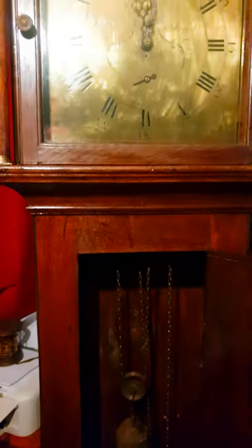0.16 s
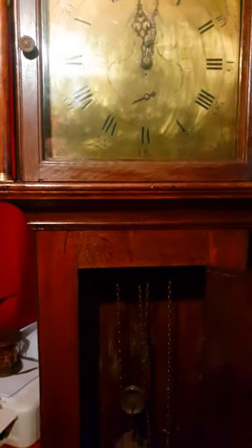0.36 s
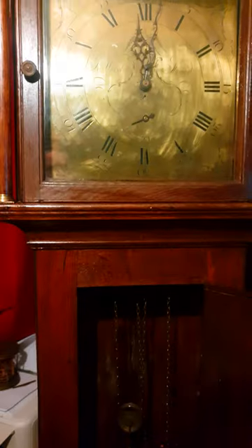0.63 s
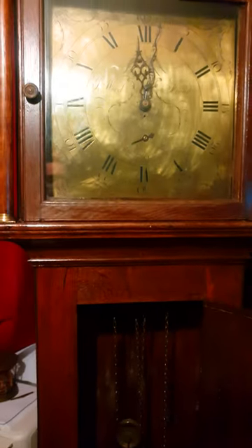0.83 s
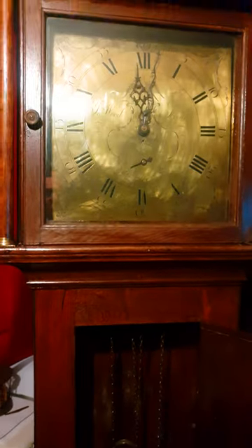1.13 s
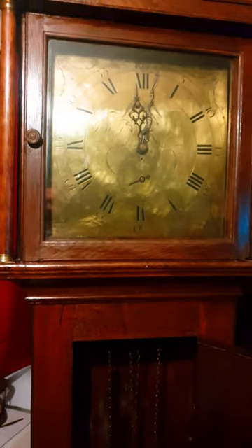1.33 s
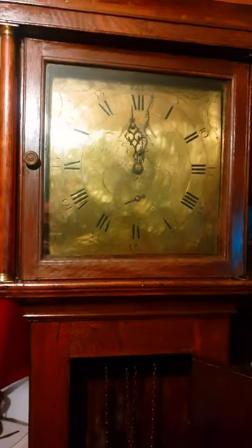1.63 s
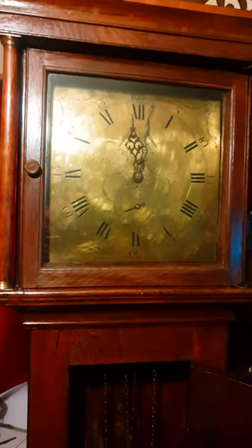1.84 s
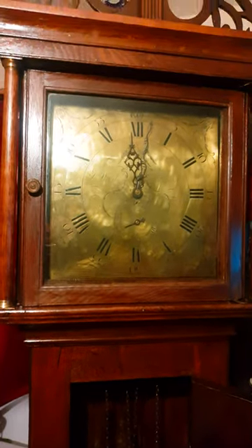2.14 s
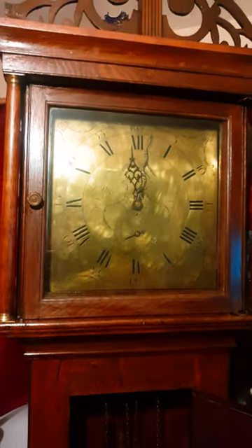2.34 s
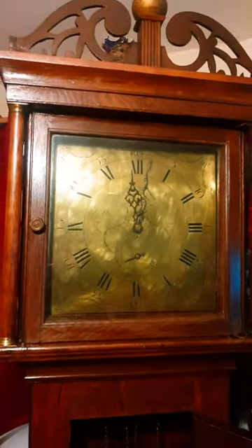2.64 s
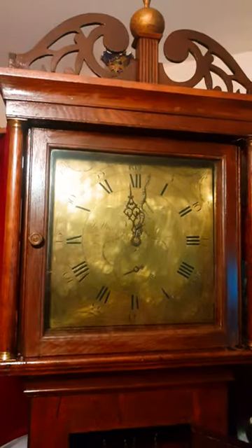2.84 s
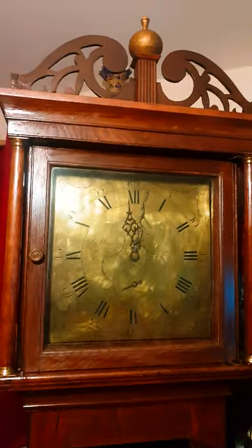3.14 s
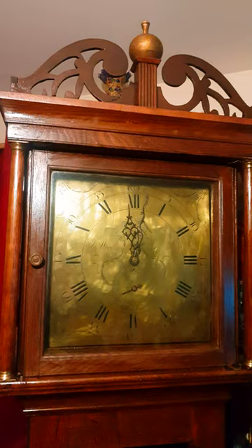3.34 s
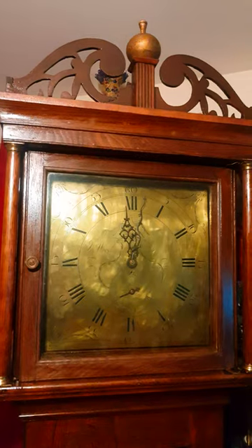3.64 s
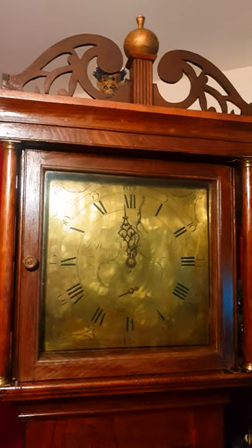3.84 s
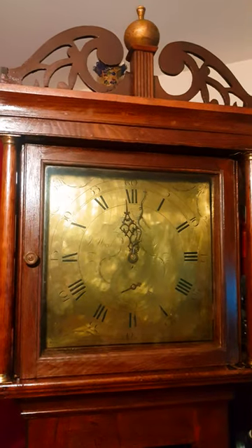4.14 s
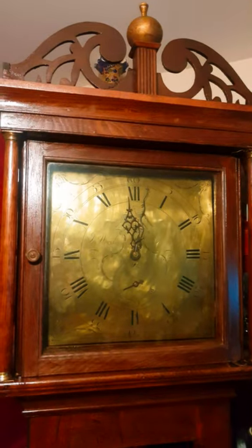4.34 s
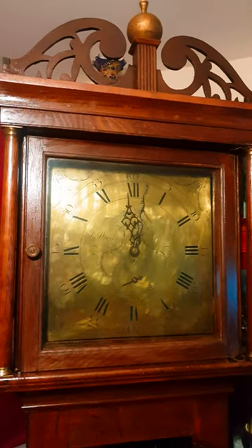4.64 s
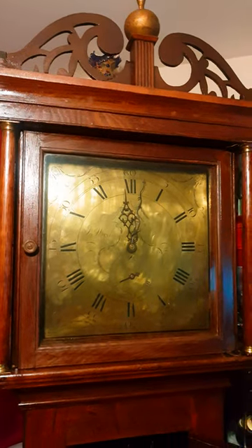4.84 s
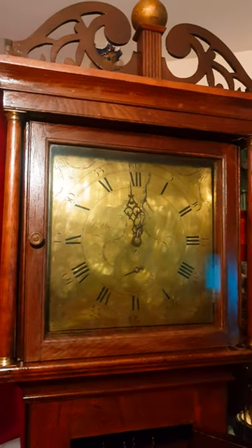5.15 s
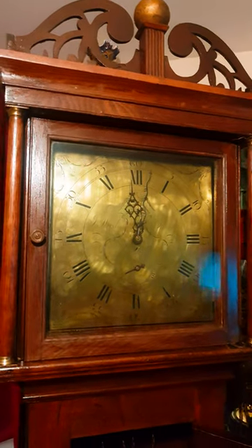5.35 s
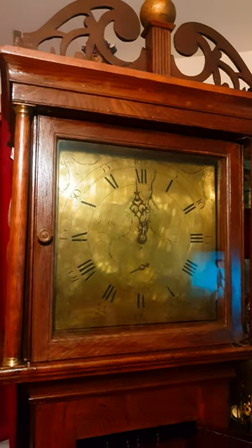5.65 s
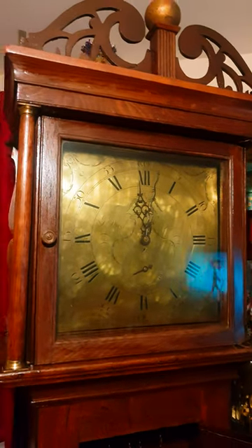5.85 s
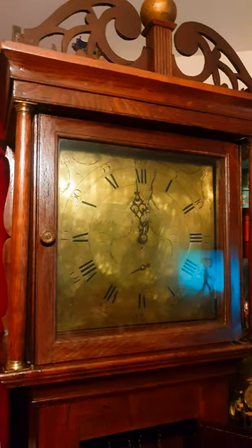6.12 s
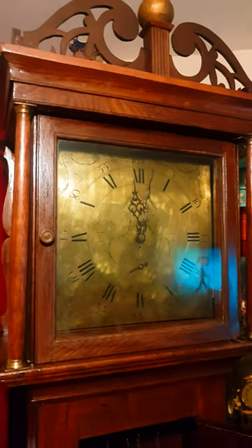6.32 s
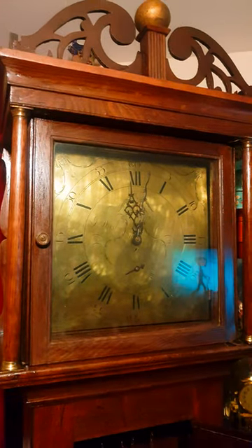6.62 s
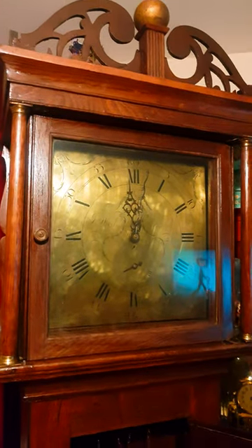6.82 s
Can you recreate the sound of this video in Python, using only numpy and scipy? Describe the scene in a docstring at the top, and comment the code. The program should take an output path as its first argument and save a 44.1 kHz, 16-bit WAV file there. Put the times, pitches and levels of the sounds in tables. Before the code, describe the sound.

A longcase clock is striking the hour in a small room. Seven evenly paced blows fall about a second apart, each a metallic hammer clank followed by a bright, wavering ring that lasts until the next. Fingers knock on the hand-held microphone now and then, mostly on the right and most often around the middle. A faint low hum and hiss lie underneath.

```python
"""In a small room with a low hum, a longcase clock strikes the hour on its bell, about every 0.95 s.
Each hammer blow excites the bell's normal modes: the high ones flash and die, the low ones ring on
until the next blow, and close pairs of them beat. A hand-held camera moves through the room's
standing waves, and fingers knock on its resonant body, mostly beside the right microphone."""
import sys
import numpy as np
from scipy import signal
from scipy.fft import rfft, irfft, next_fast_len
from scipy.io import wavfile
from scipy.ndimage import map_coordinates

SR = 44100
rng = np.random.default_rng(int(sys.argv[2]) if len(sys.argv) > 2 else 0)


def dump(signal):
    """Clip the signal to [-1, 1] and save it as 16-bit WAV at the path in sys.argv[1]."""
    limited = np.clip(np.atleast_2d(signal).T, -1, 1)
    pcm = np.round(limited * 32767).astype(np.int16)
    wavfile.write(sys.argv[1], SR, pcm)


N = 307814
BAND_LIMIT_HZ = 15900

# The bell's long partials, each with a twin mode: (frequency [Hz], t60 [s], twin's offset [Hz],
# phase lead at the left microphone [rad], twin's phase lead [rad])
PARTIALS = [(604.6, 13, .4, .6, .6), (1468.7, 6.3, 10.6, -2.45, 1.4), (2626.8, 3.4, 1.0, 1.6, 1.6),
            (4029.2, 1.75, -14.9, .9, -.3), (5633.5, .87, 3, -1.7, -1.7)]
# Hammer blows: (time [s], five partial levels [dB], their left minus right [dB], flash level [dB],
# its left minus right [dB], t60 stretch of the upper three partials [ratio], second's twin level [dB])
BLOWS = [(-.53, (-42.5, -38.5, -39.5, -29.5, -18), (1, 8, -1, 3, -9), -26, 6, 0.89, -22),
         (.427, (-38.5, -36, -35.5, -31, -26.5), (0.5, 1.5, 6, 0, 3.5), -20, 0.5, 1.02, -34),
         (1.377, (-38, -41, -31.5, -32.5, -28.5), (1, 12.5, -4.5, 1, -2.5), -18, 2.5, .85, -23),
         (2.351, (-38, -36, -32, -29.5, -21.5), (1.5, 4.5, -8.5, 9.5, -11), -22, 3.5, 1.125, -21),
         (3.324, (-50, -37, -30.5, -18, -19), (2, -3, -7.5, 3.5, -5), -20, 4.5, 0.8, -13.5),
         (4.254, (-44, -39.5, -37, -28.5, -28.5), (2, 6, -1.5, 2.5, 12.5), -30.5, 9, 0.81, -19.5),
         (5.204, (-44, -37.5, -36, -27.5, -25.5), (5, -2.5, 5, -2.5, 0), -29.5, 9, 1.015, -13),
         (6.142, (-51.5, -41.5, -30, -25.5, -19), (5.5, -3.5, -0.5, -11.5, -17.5), -21.5, 3, 0.86, -9.5)]
def bell_ring(swell_s=0.0067, handover_s=0.008, twin_scatter_db=3, beat_scatter_rad=0.4):
    """Beating: each long partial interferes with its twin mode at their difference frequency."""
    t = np.arange(SR + SR // 8) / SR
    rings = np.zeros((len(PARTIALS), 2, N))
    echo_depths = (0.3, 0.5, 0.6, 0.6, 0.6)
    gaps = np.append(np.diff([blow[0] for blow in BLOWS]), 2)
    for (onset, levels, sides, *_, sustain, warble_db), gap in zip(BLOWS, gaps):
        # the stronger the twin, the deeper the beat
        twins_db = rng.normal([-26, warble_db, -26, -5, -8], twin_scatter_db, (2, 5)).T[..., None]
        stretches = (1, 1, sustain, sustain, sustain)
        swell = (1 - np.exp(-t / swell_s)) ** 2  # the ring builds up in the case
        handover = np.exp(-np.maximum(t - gap, 0) / handover_s)  # and gives way to the next blow
        for k, (hz, t60, split_hz, lead, twin_lead) in enumerate(PARTIALS):
            # the twin radiates another way, so the microphones hear the beat out of step
            beat_phase = beat_scatter_rad * rng.standard_normal((2, 1)) + [[twin_lead - lead], [0]]
            twin = amp(twins_db[k]) * np.exp(1j * (2 * np.pi * split_hz * t + beat_phase))
            beating = (1 + twin) / np.sqrt((1 + amp(2 * twins_db[k])) / 2)
            tone = np.exp(2j * np.pi * (hz * t + rng.random())) * np.exp([[1j * lead], [0]])
            heard = (tone * beating * echo_buildup(t, along(ROOM_DECAY, hz), echo_depths[k])).real
            envelope = swell * handover * amp(levels[k] - 60 * t / (t60 * stretches[k]))
            add(rings[k], onset, envelope * pan(sides[k]) * heard)
    return (rings * standing_waves()).sum(axis=0)


# The bell's short, bright modes: (frequency [Hz], relative level [dB], t60 [s])
BRIGHT_MODES = [(5776, -19, .4), (7450, -6, .5), (7467, -4, .5), (8316, -11, .19), (9506, 2, .19),
                (9632, -2, .3), (9692, 0, .3), (9922, -6, .28), (10641, -11, .2), (10835, -13, .18),
                (11250, -1, .22), (11376, -8, .19), (11730, 0, .38), (12589, -11, .23), (12796, -5, .17),
                (13234, -3, .18), (13989, -3, .2), (14141, 5, .2), (14199, -2, .2), (15365, -5, .17),
                (15627, 2, .22)]
# Spectrum of the hammer's clank and crack: (frequency [Hz], relative spectral density [dB])
CLANK_SPECTRUM = [(200, -44), (900, -1.5), (1500, 13), (3000, 13.5), (4800, 12), (6200, 24), (7200, 20),
                  (7900, 3), (8800, 10), (9600, 23.5), (12000, 18), (15500, -65), (16500, -26)]
def bell_flash(attack_s=0.0031, clank_db=-3, clank_t60=0.17, clank_modes=80,
               crack_db=-5, crack_t60=0.06, rebound_s=0.011, rebound_db=-3, scatter_db=1.5):
    """Impact excitation: the hammer cracks on the rim, ringing its linkage and the bell's high modes."""
    out = np.zeros((2, N))
    t = np.arange(SR) / SR
    rise = 1 - np.exp(-t / attack_s)
    # the springy hammer touches the rim a second time
    rebound = (t > rebound_s) * amp(rebound_db - 60 * (t - rebound_s) / crack_t60)
    contacts = amp(-60 * t / crack_t60) + rebound
    clank_hz = np.linspace(CLANK_SPECTRUM[1][0], BAND_LIMIT_HZ, clank_modes)[:, None]
    clank_hz += 50 * rng.standard_normal((clank_modes, 1))
    linkage = amp(along(CLANK_SPECTRUM, clank_hz)) * np.exp(2j * np.pi * clank_hz * t[:SR // 4])
    for onset, _, _, flash_db, side_db, *_ in BLOWS:
        ring = np.zeros((2, SR))
        for hz, db, t60 in BRIGHT_MODES:
            decay = amp(db + scatter_db * rng.standard_normal() - 60 * t / t60)
            ring += decay * np.sin(2 * np.pi * (hz * t + rng.random((2, 1))))
        ring = reverberate(rise * ring, wet_db=-1.5)
        ring /= np.sqrt(np.mean(ring[:, :SR // 9] ** 2))
        # each blow excites the linkage's modes at new strengths
        clank = unit((complex_noise(clank_modes) @ linkage).real)
        clank = np.pad(clank, ((0, 0), (0, SR - SR // 4))) * amp(clank_db - 60 * t / clank_t60)
        crack = amp(crack_db) * contacts * noise(CLANK_SPECTRUM, SR)
        add(out, onset, amp(flash_db) * pan(side_db) * (ring + rise * (clank + crack)))
    return out


# Finger knocks: (time [s], relative level [dB], contact cutoff [Hz], left channel's gain [dB])
KNOCKS = [(0.929, -26.5, 131, 11.5), (0.975, -27.5, 132, 11), (2.829, -29.5, 127, 15.5),
          (2.867, -9.5, 130, -21), (3.289, -16, 150, -3.5), (3.6889, -5, 3070, -39),
          (3.7322, -4.5, 5700, -23), (4.039, -5.5, 5150, -40), (4.353, -1.5, 3420, -45),
          (4.73, -0.5, 1320, -51), (5.7875, -9.5, 316, -41), (6.4273, -14, 360, -29)]
# Modes of the camera's body: (frequency [Hz], bandwidth [Hz], relative level [dB], first swing [sign])
BODY_MODES = [(56, 37, -17, 0), (118, 40, -3, -3.5), (431, 172, 1.5, 4), (875, 540, -5, -1),
              (2710, 800, -11.5, -1), (4250, 1730, -10, -1), (11070, 1800, -9.5, -1.5)]
def finger_knocks(gain_db=29):
    """Impulse response: a fingertip's push rings the camera's damped body; a softer touch is duller."""
    def body(f):
        return sum(np.sign(swing) * amp(db) * 1j * f * width / (hz ** 2 - f ** 2 + 1j * f * width)
                   for hz, width, db, swing in BODY_MODES)

    out = np.zeros((2, N))
    push = signal.unit_impulse(SR // 8)
    for onset, db, cutoff_hz, left_db in KNOCKS:
        contact = lambda f: 1 / (1 + 1j * np.sqrt(2) * f / cutoff_hz - (f / cutoff_hz) ** 2)
        knock = filtered(push, lambda f: body(f) * contact(f))
        add(out, onset, amp(db + gain_db) * amp([[left_db], [0]]) * knock)
    return out


# Passages through nodes of the third partial: (time [s], left dip [dB], right dip [dB])
NODES = [(.97, -1, 6), (2.2, 11, -2.5), (2.58, -2, 23.5), (5.75, 10, -11), (6.08, 1, 7.5), (6.79, -3.5, 9)]
def standing_waves(sway_db_per_khz=0.4252, sway_per_s=2.43, node_half_width_s=0.17):
    """Standing waves: each partial's gain varies as the microphones sway, most for short wavelengths."""
    t = np.arange(N) / SR
    depths_db = [sway_db_per_khz * hz / 1000 for hz, *_ in PARTIALS]
    gain_db = np.array([[depth * wobble(sway_per_s) for _ in "LR"] for depth in depths_db])
    for time, *dips_db in NODES:
        nearness = 1 / (1 + ((t - time) / node_half_width_s) ** 2)
        gain_db[2] -= np.outer(dips_db, nearness)
    return amp(gain_db)


def echo_buildup(t, t60, depth):
    """Superposition: as echoes arrive, a tone's complex gain stutters, then settles at 1."""
    echoes = complex_noise(len(t)) * amp(-60 * t / t60)
    still_to_come = np.cumsum(echoes[:, ::-1], axis=1)[:, ::-1]
    return 1 - depth * still_to_come / np.linalg.norm(echoes[0])


# The room's reverberation time: (frequency [Hz], t60 [s])
ROOM_DECAY = [(200, 0.3), (2000, 0.31), (8000, 0.22), (15000, 0.24)]
def reverberate(direct, wet_db):
    """Diffuse reverberation: a decaying noise tail follows the direct sound at each microphone."""
    hz, t, spectra = signal.stft(rng.standard_normal((2, SR // 3)), SR, nperseg=256)
    decay = amp(-60 * t / along(ROOM_DECAY, hz)[:, None])
    tail = signal.istft(spectra * decay, SR, nperseg=256)[1]
    wet = signal.fftconvolve(direct, tail / np.linalg.norm(tail[0]), axes=1)
    return direct + amp(wet_db) * wet[:, :direct.shape[1]]


# Base level common to rumble and hiss: (time [s], level [dB])
NOISE_LEVEL = [(0.0, -61.5), (0.21, -65), (0.66, -64), (0.91, -62.5), (1.61, -65), (1.94, -65),
               (3.22, -62.5), (3.56, -63), (4.29, -65), (4.43, -68.5), (4.86, -71), (6.24, -62.5),
               (6.67, -67.5), (6.98, -67.5)]
# The room's rumble: (frequency [Hz], relative spectral density [dB])
RUMBLE_SPECTRUM = [(25, -38), (55, -6), (120, -7), (180, -2), (290, 1), (450, 3.5), (700, -9.5),
                   (1200, -16.5), (2500, -52)]
# The microphones' hiss: (frequency [Hz], relative spectral density [dB])
HISS_SPECTRUM = [(500, -33), (1300, 16), (2300, 9), (3200, -7.5), (4500, -2.5), (6000, 8), (7800, -7.5),
                 (10500, 7), (14500, 7), (16000, 9)]
# Base level of the two lower hum lines: (time [s], level [dB])
HUM_LEVEL = [(0.0, -73), (0.95, -60.5), (2.78, -68.5), (3.62, -63), (5.52, -69), (6.16, -63.5), (6.98, -74)]
# The room's three hum lines: (frequency [Hz])
HUM_HZ = (72, 219, 279)
def room_tone(rumble_db=11, hiss_db=14, width=0.62, waver_db=1.2, waver_per_s=6, drift_rad=0.5):
    """Noise floor: partly coherent room rumble and a wavering hum add to incoherent microphone hiss."""
    t = np.arange(N) / SR
    floor_db = np.interp(t, *np.transpose(NOISE_LEVEL))
    hum_db = np.interp(t, *np.transpose(HUM_LEVEL))
    mid, side = noise(RUMBLE_SPECTRUM, N)
    rumble = unit(np.array([mid + width * side, mid - width * side]))
    rumble *= amp(floor_db + rumble_db + waver_db * wobble(waver_per_s))
    hum = np.zeros(N)
    for hz, db in zip(HUM_HZ, (hum_db + 1, hum_db + 1.5, -61.5)):
        peak = np.sqrt(2) * amp(db + waver_db * wobble(waver_per_s))
        hum += peak * np.sin(2 * np.pi * hz * t + drift_rad * wobble(5.3))
    hiss = amp(floor_db + hiss_db) * noise(HISS_SPECTRUM, N)
    return rumble + hum + hiss


def amp(db):
    """Decibel law: amplitude grows tenfold every 20 dB."""
    return 10 ** (np.asarray(db) / 20)


def unit(x):
    """Normalisation to rms 1."""
    return x / np.sqrt(np.mean(x ** 2) + 1e-20)


def along(points, hz):
    """Interpolation of (frequency [Hz], value) points on a logarithmic frequency axis."""
    knots_hz, values = np.transpose(points)
    return np.interp(np.log(hz + 1), np.log(knots_hz + 1), values)


def pan(db):
    """Level difference, split evenly into left and right gains."""
    return amp(np.array([[db], [-db]]) / 2)


def wobble(per_s):
    """Slow random modulation: a spline through per_s knots a second."""
    knots = rng.standard_normal(int(N * per_s / SR) + 4)
    return map_coordinates(knots, [np.arange(N) * per_s / SR])


def filtered(x, response):
    """Linear filtering: the spectrum of x times a complex frequency response."""
    size = x.shape[-1]
    padded = next_fast_len(size + SR // 4)
    return irfft(rfft(x, padded) * response(np.fft.rfftfreq(padded, 1 / SR)), padded)[..., :size]


def noise(spectrum, size):
    """Spectral shaping: coloured noise of rms 1, uncorrelated between the channels."""
    return unit(filtered(rng.standard_normal((2, size)), lambda hz: amp(along(spectrum, hz))))


def complex_noise(size):
    """Gaussian phasors: random amplitudes and phases for two channels."""
    return rng.standard_normal((2, size)) + 1j * rng.standard_normal((2, size))


def add(track, onset_s, sound):
    """Superposition of a sound on the track from its onset."""
    start = round(onset_s * SR)
    part = sound[:, max(-start, 0):max(N - start, 0)]
    track[:, max(start, 0):][:, :part.shape[1]] += part


def scene():
    """Superposition: the pressures of bell, knocks and background add."""
    return bell_ring() + bell_flash() + finger_knocks() + room_tone()


# Response of the duller right microphone: (frequency [Hz], gain [dB])
RIGHT_RESPONSE = [(11500, 0.5), (13000, -10), (14200, -5.5), (15600, -41)]
def record(dry):
    """Transduction: the right microphone loses treble; both channels saturate and are band-limited."""
    picked_up = filtered(dry, lambda hz: amp([0 * hz, along(RIGHT_RESPONSE, hz)]))
    return filtered(np.clip(picked_up, -1, 1), lambda hz: hz < BAND_LIMIT_HZ)


dry = scene()
out = record(dry)
dump(out)
```